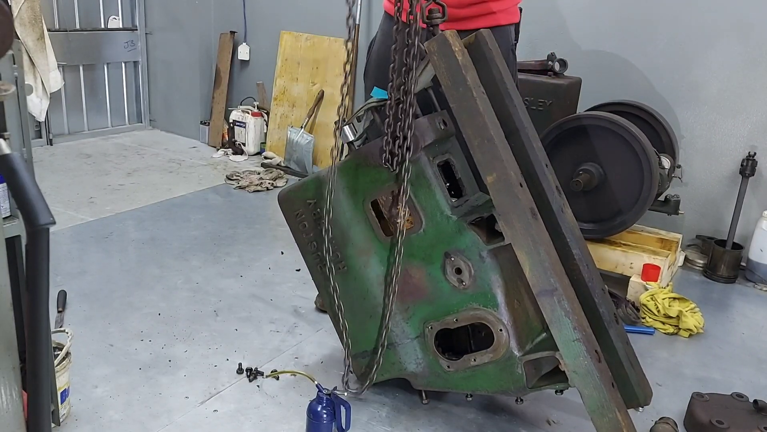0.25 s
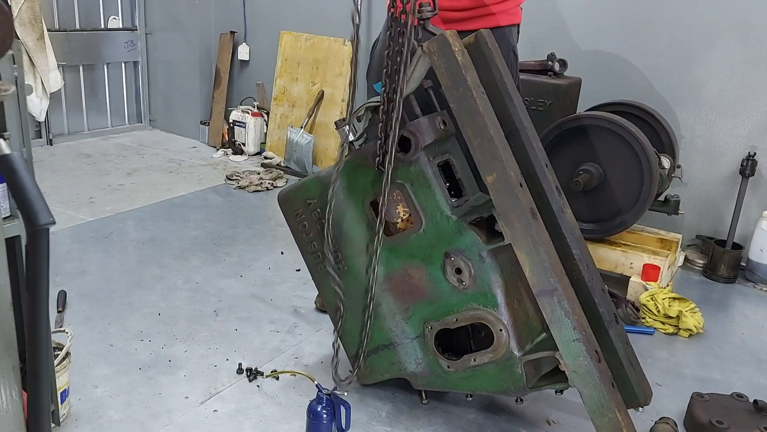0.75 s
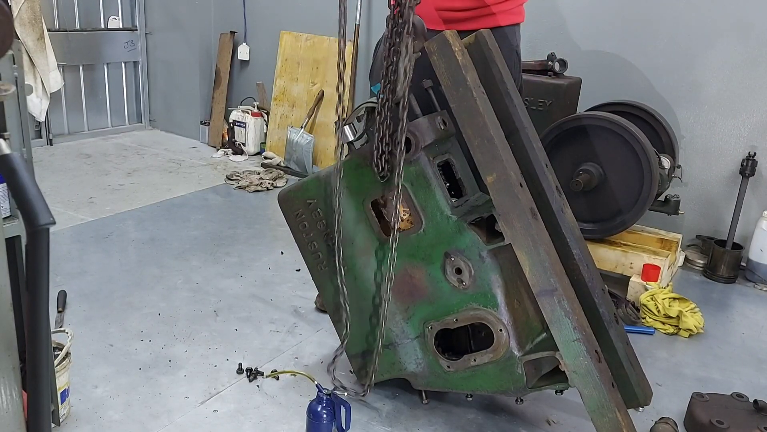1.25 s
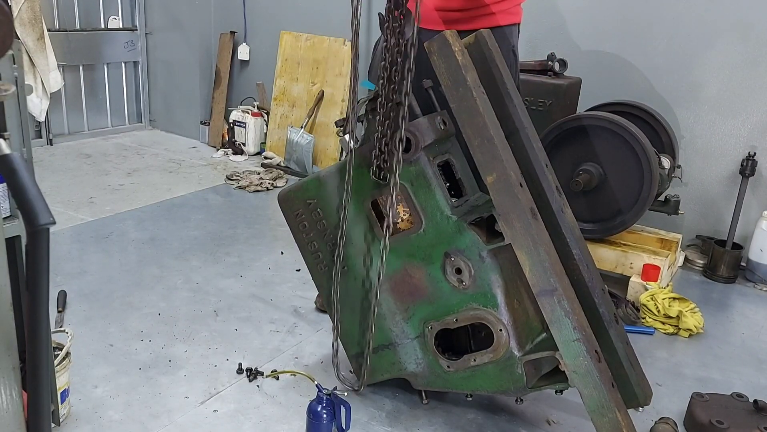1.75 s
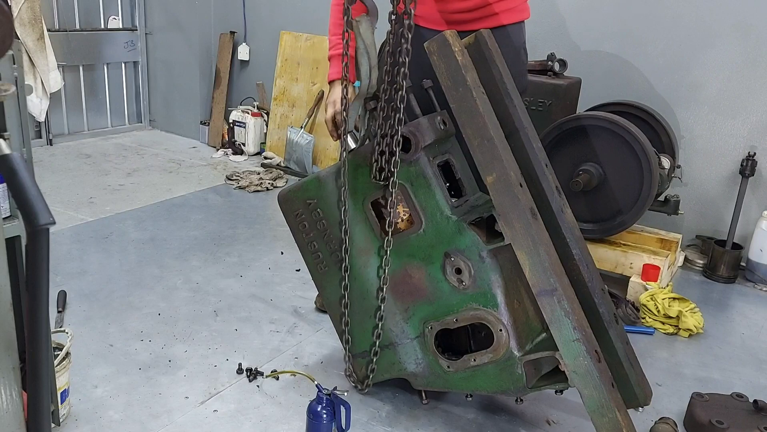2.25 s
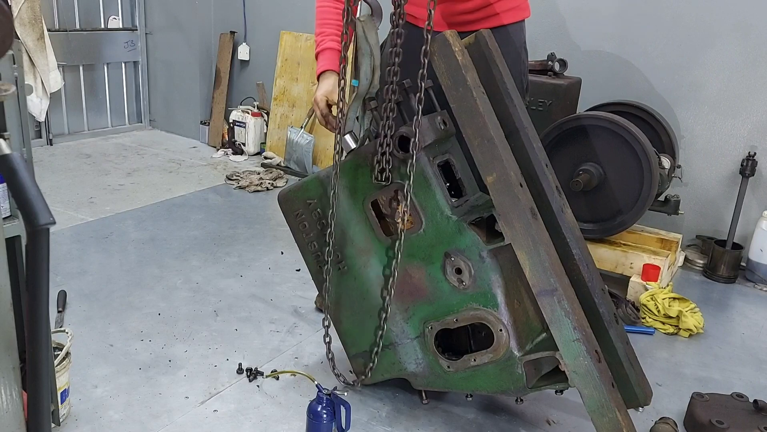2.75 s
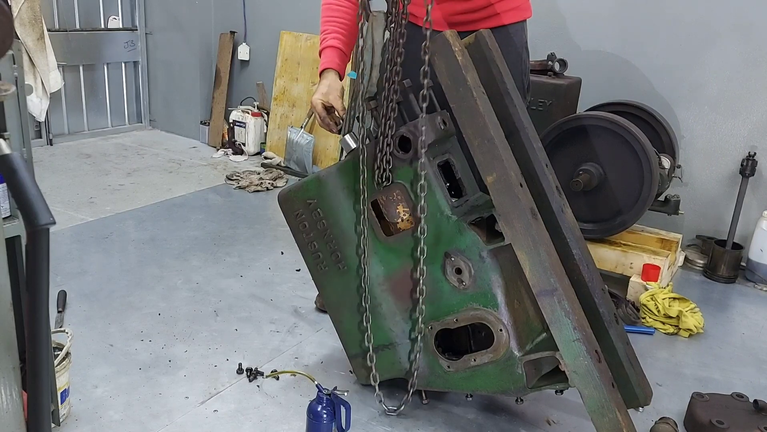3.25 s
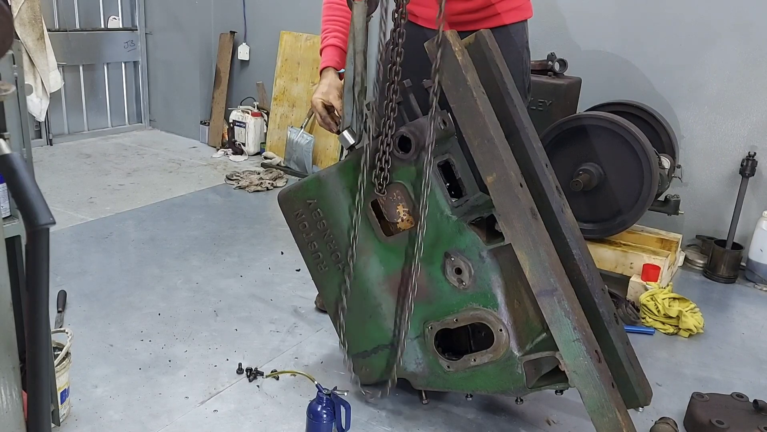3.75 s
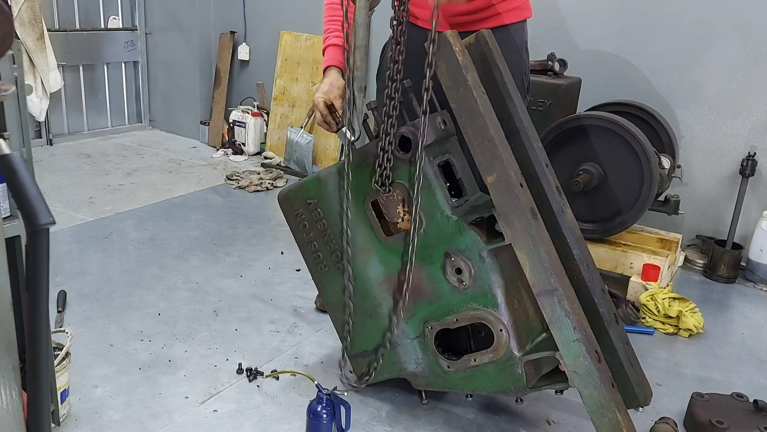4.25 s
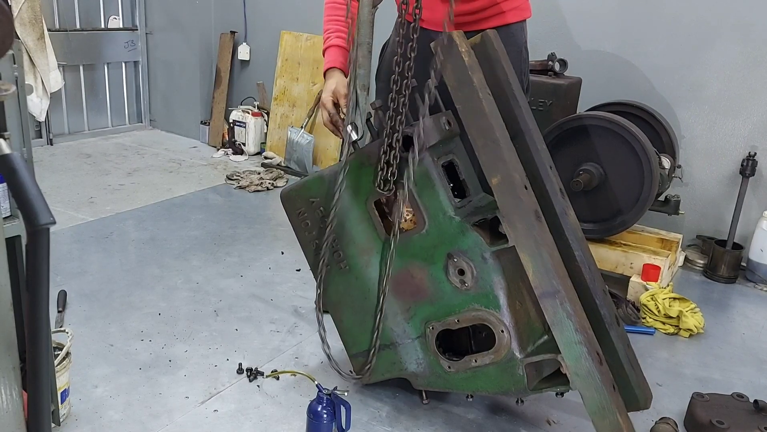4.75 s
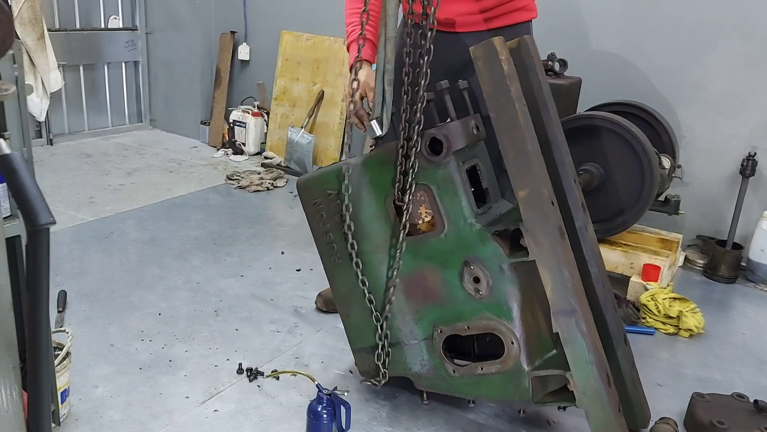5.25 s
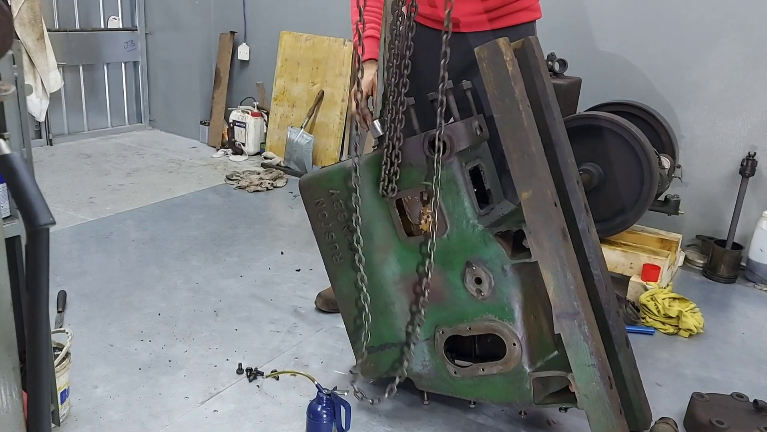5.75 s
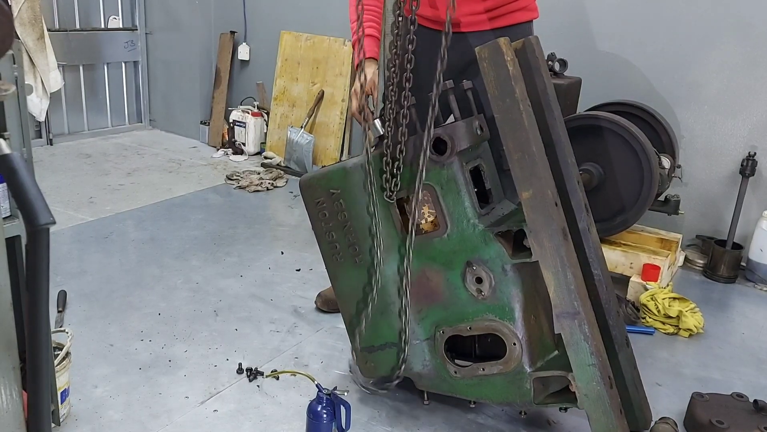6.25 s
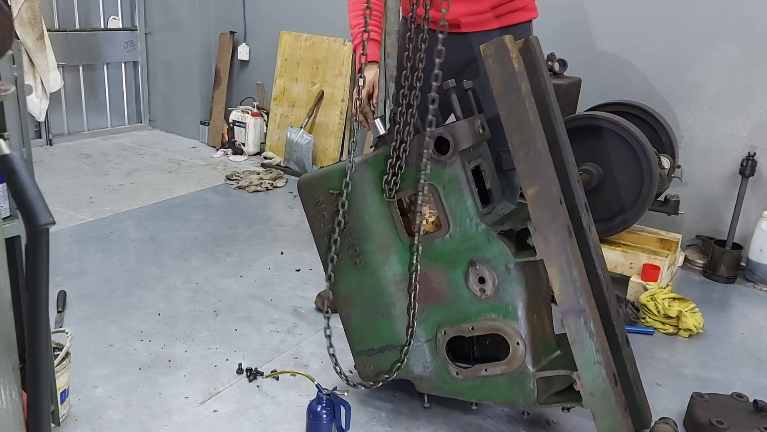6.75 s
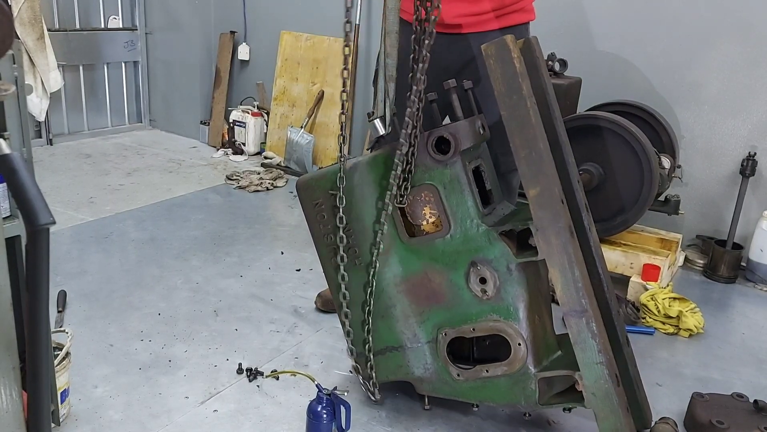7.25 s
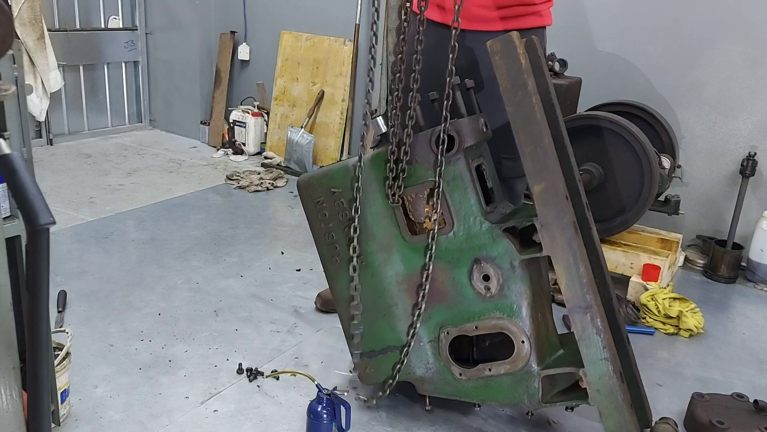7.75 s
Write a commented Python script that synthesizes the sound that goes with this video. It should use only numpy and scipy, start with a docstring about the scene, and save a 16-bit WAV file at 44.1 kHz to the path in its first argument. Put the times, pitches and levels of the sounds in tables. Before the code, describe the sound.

A hand chain hoist works in a hard, echoing workshop, heard from a few metres and louder on the left. From 0 to 2.2 s, three pulls give rapid, sharp steel ratchet clicks, roughly twenty to thirty a second, over a thin chain rattle. The slack loop jingles and knocks on the hollow casting, strongest around 1.5 s. A lull with a small clatter at 2.3 s follows. Pulls resume from 2.9 to 5.15 s in close spells, with bright link slaps near 3.4 and 3.6 s. At 5.25 s a link chinks, then at 5.33 s the load shifts with a crunch, rumble and long low boom, under more clicks until 5.8 s. Another pull runs 6.05-6.45 s; chain scrapes the ringing iron at 6.4 s, with a very faint second shift. Small clinks around 7 s fade, then four slower, firm clicks from 7.45 to 7.8 s and a last light scrape over faint still air.

```python
"""A hand chain hoist lifts a heavy iron casting in a bare, echoing workshop, pull by pull.
Its pawl clicks over the ratchet (short noise snaps), and the hand chain rattles through the wheel
(random ticks and pings). The slack loop slaps and drags on the load, whose iron modes ring along.
The load shifts with a thud and a long low boom, and once more very faintly. Still air lies behind."""
import sys
import numpy as np
from scipy import signal
from scipy.fft import rfft, irfft, next_fast_len
from scipy.io import wavfile
from scipy.ndimage import uniform_filter1d

SR = 44100
rng = np.random.default_rng(int(sys.argv[2]) if len(sys.argv) > 2 else 0)


def generate_wav(signal):
    """Clip the signal to [-1, 1] and save it as 16-bit WAV at the path in sys.argv[1]."""
    frames = np.transpose(np.atleast_2d(signal))
    scaled = np.clip(frames, -1, 1) * 32767
    pcm = np.round(scaled).astype(np.int16)
    wavfile.write(sys.argv[1], SR, pcm)


N = 353241  # length of the scene in samples
TOP_HZ = 15850  # nothing sounds above this pitch

# All levels are relative: the mix adds its own gains. A t60_s is the time to fade by 60 dB.

# Pulls on the hand chain: [first_click_s, last_click_s, clicks, start_lag_teeth, stop_lag_teeth,
# pawl_db, chain_start_db, chain_end_db]
# The lags say how slowly the wheel gets going and comes to rest, in tooth times; their sign is ignored.
PULLS = [(0.0054, 0.5573, 12, 0.9, 8.5, -16, -31, -38), (0.683, 1.3662, 20, 0.3, 1.13, -15.5, -29.5, -34),
         (1.4604, 2.1724, 15, 0, 5.5, -20.5, -35, -36.5), (2.871, 3.288, 11, 1.3, 0.24, -18.5, -31.5, -34),
         (3.3785, 3.927, 18, -1, 2.1, -18.5, -31.5, -40), (3.9857, 4.564, 13, -1, 8.5, -19, -33, -49.5),
         (4.6553, 5.1467, 12, 1, 2.5, -18.5, -40.5, -35.5), (5.343, 5.7605, 12, 1, 1, -16, -32, -38.5),
         (6.0625, 6.4524, 10, 1.9, 2.3, -16.5, -34.5, -38), (7.443, 7.8124, 4, 5, 5.5, -13, -48, -46)]
# Broad tone of the pawl: [pitch_hz, level_db]
PAWL_TONE = [(50, -22), (200, -15.5), (420, -6.5), (750, -12.5), (1300, -0.5), (5000, -2.5), (8300, -2),
             (15500, -6.5)]
# Ringing pitches of the pawl: [pitch_hz, width_hz, level_db]
PAWL_RING = [(1521, 75, 6), (4440, 400, 6), (10100, 365, 14.5), (13720, 390, 14)]


def ratchet():
    """The pawl snaps onto each tooth and chatters for a few milliseconds."""
    db_per_doubling = 0.56  # a faster wheel flicks the pawl harder
    scatter_db, first_click_db = 0.76, -1.5  # teeth differ; each pull starts gently, taking up the slack
    drops = np.zeros(N)
    for *stroke, pawl_db, _, _ in PULLS:
        clicks = teeth(*stroke)
        scatter = rng.normal(0, scatter_db, len(clicks))
        levels = pawl_db + 4 + db_per_doubling * speed(clicks) + scatter
        levels[0] += first_click_db
        for click_s, level_db in zip(clicks, levels):
            add(drops, click_s, amp(level_db) * snap(t60=0.017, attack=0.0015))
    return colour(drops, PAWL_TONE, PAWL_RING)


def teeth(first, last, clicks, start_lag, stop_lag):
    """Click times of one pull: the wheel gathers speed, runs, and slows as the arm runs out of reach."""
    k = np.arange(1, round(clicks))
    gaps = 1 + abs(start_lag) / k + abs(stop_lag) / k[::-1]
    return first + (last - first) * np.append(0, np.cumsum(gaps)) / gaps.sum()


def speed(clicks):
    """The wheel's speed at each click, in doublings above a brisk pull."""
    brisk_rate = 33  # teeth per second
    return np.log2(1 / np.gradient(clicks) / brisk_rate)


# Tone of the chain in its wheel: [pitch_hz, level_db]
WHEEL_TONE = [(30, -38.5), (100, -12), (220, -15.5), (400, -12.5), (850, -14.5), (1500, -0.5), (2400, -2.5),
              (4500, -3.5), (6600, 0.5), (8200, -15.5), (10500, -3.5), (15800, -13)]


def hand_chain():
    """Links tumble through the wheel and its guide, louder the faster the pull."""
    db_per_doubling = 1.5  # a faster chain is louder
    take_up_s = 0.064  # the rattle builds up after the first click
    t, gain = np.arange(N) / SR, np.zeros(N)
    for *stroke, _, start_db, end_db in PULLS:
        clicks = teeth(*stroke)
        level_db = np.linspace(start_db, end_db, len(clicks)) + db_per_doubling * speed(clicks)
        build_up = np.clip((t - clicks[0]) / take_up_s, 0, 1)
        gain += np.interp(t, clicks, amp(level_db), right=0) * build_up
    rattle = links(rate=700, spread_db=5.5, ring_t60=0.037)
    return amp(-2.5) * gain * unit(colour(rattle, WHEEL_TONE))


# The slack loop swings against the casting: [start_s, rise_s, hold_s, jingle_db, knock_db]
SWINGS = [(0, 0.0026, 0.016, -27.5, -52), (0.1, 0.049, 0.0092, -29.5, -34.5),
          (0.358, 0.02, 0.014, -28.5, -52), (0.377, 0.01, 0.036, -38, -41),
          (0.574, 0.037, 0.087, -31.5, -40.5), (0.797, 0.15, 0.06, -24, -47),
          (1.442, 0.054, 0.076, -19, -27.5), (1.604, 0.018, 0.15, -24, -32),
          (1.868, 0.027, 0.044, -41.5, -44), (2.05, 0.032, 0.081, -41, -44.5),
          (2.868, 0.036, 0.16, -31, -44), (3.33, 0.1, 0.1, -20, -32), (3.579, 0.038, 0.035, -21, -30),
          (3.996, 0.075, 0.15, -25, -36), (4.746, 0.065, 0.12, -34, -50.5), (5.133, 0.04, 0.08, -42, -50),
          (5.415, 0.01, 0.016, -28, -35.5), (5.508, 0.036, 0.046, -26, -42),
          (6.74, 0.026, 0.045, -71.5, -63), (7.03, 0.004, 0.0093, -53, -46), (7.3, 0.03, 0.06, -65, -65)]
# Single links strike the load: [start_s, level_db]
LINK_STRIKES = [(0.1654, -4), (0.345, -6), (1.5538, -10), (1.6236, -5), (1.6902, -4), (2.084, -25.5),
                (2.526, -43.5), (2.7703, -52), (2.7902, -36), (2.8432, -25.5), (3.3623, -9), (3.6297, -5.5),
                (5.3142, -20), (5.4268, -11.5), (6.98, -38.5), (7.0323, -25.5), (7.3896, -38.5)]
# Bright tone of the links: [pitch_hz, level_db]
JINGLE_TONE = [(200, -46.5), (1100, -10), (2000, -7.5), (3300, -7), (4100, -1.5), (7000, 0.5),
               (12000, -4.5), (15500, -16.5)]
# Dull tone of the knocks: [pitch_hz, level_db]
KNOCK_TONE = [(50, -26), (230, -13), (340, -5), (540, 0.5), (750, 1.5), (1100, -4.5), (2500, -33)]
# Resonances of the casting's hollow wall: [pitch_hz, width_hz, level_db]
HOLLOW_WALL = [(325, 24, 8.5), (480, 57, 6), (588, 57, 2.5)]


def slack_loop():
    """Swinging links jingle on the casting, whose hollow wall knocks under them."""
    jingle_gain, knock_gain, strikes = np.zeros((3, N))
    for s, rise, hold, jingle_db, knock_db in SWINGS:
        contact = swell(s, rise, hold, release_t60=0.33)  # the links settle
        jingle_gain = np.maximum(jingle_gain, amp(jingle_db) * contact)
        knock_gain = np.maximum(knock_gain, amp(knock_db) * contact)
    bright_links = links(rate=450, spread_db=7, ring_t60=0.026)
    dull_links = links(rate=160, spread_db=5.5, ring_t60=0.014)
    jingle = jingle_gain * unit(colour(bright_links, JINGLE_TONE))
    knock = knock_gain * unit(colour(dull_links, KNOCK_TONE, HOLLOW_WALL))
    for s, level_db in LINK_STRIKES:
        add(strikes, s, amp(level_db - 6) * snap(t60=0.024, attack=0.00019))
    return amp(-3.5) * jingle + amp(-7) * knock + colour(strikes, JINGLE_TONE)


# The chain drags over a ringing edge of the load: [start_s, rise_s, hold_s, level_db]
DRAGS = [(6.418, 0.005, 0.025, -22.5), (6.496, 0.02, 0.1, -38.5), (6.726, 0.027, 0.072, -49.5),
         (7.043, 0.03, 0.064, -39), (7.187, 0.031, 0.036, -57), (7.771, 0.02, 0.098, -30.5)]
# Tone of grating links: [pitch_hz, level_db]
GRATE_TONE = [(100, -35), (400, -5), (850, -5), (1400, 1.5), (1900, -2), (4000, -2.5), (5500, -6.5),
              (14000, -19)]


def drag():
    """Links grate over an edge of the load and take on the colour of its ringing pitches."""
    contact = sum(amp(db) * swell(s, rise, hold, release_t60=0.15) for s, rise, hold, db in DRAGS)
    edge_width_hz, edge_db = 33, 13.5
    edge = [(hz, edge_width_hz, db + edge_db) for hz, db, _ in IRON_MODES]
    grating = links(rate=600, spread_db=11, ring_t60=0.03)
    return amp(-5) * contact * unit(colour(grating, GRATE_TONE, edge))


# The load's ringing pitches, before the chain damps them: [pitch_hz, level_db, t60_s]
IRON_MODES = [(562, -7, 0.85), (762, -16, 4.8), (975, -13.5, 1.2), (1283, -8, 1.1), (1370, -6, 2.4),
              (1590, -16.5, 1.1), (1779, 2.5, 0.39), (2164, -6, 0.42), (2606, -4.5, 0.48),
              (2970, -19.5, 0.4), (3210, -11, 0.61), (3260, -8.5, 0.5), (3800, -9.5, 0.4), (3980, -9, 0.45),
              (4370, -19, 0.4), (4910, -21, 0.35)]


def iron_ring(contacts):
    """Every mode of the load fills with the energy of the contacts and leaks it at its own speed."""
    damping_t60 = 2.2  # s, the chain lying on the iron shortens its ring
    t, out = np.arange(N) / SR, np.zeros((2, N))
    for hz, db, t60 in IRON_MODES:
        # share of the energy left after one sample
        keep = np.exp(-2 * np.log(1000) * (1 / t60 + 1 / damping_t60) / SR)
        wandering = contacts * amp(0.92 * wobble(rate=5.4))  # the contact point wanders
        energy = signal.lfilter([1 / SR], [1, -keep], wandering ** 2)
        start_phase = rng.uniform(0, 2 * np.pi, (2, 1))  # left and right differ
        phase = 2 * np.pi * hz * t + .5 * wobble(rate=37) + start_phase
        out += amp(db + 1.4 * wobble(rate=23)) * np.sqrt(energy) * np.sin(phase)
    return out


# The load shifts on the floor: [start_s, length_s, crunch_db, rumble_db, boom_db]
SHIFTS = [(5.327, 0.27, -30.5, -34, -28.5), (6.519, 0.4, -50, -44.5, -48)]
# Tone of the crunch: [pitch_hz, level_db]
CRUNCH_TONE = [(50, -23), (130, -4.5), (220, -16), (330, -0.5), (560, -2.5), (800, -12), (2500, -30.5)]
# Tone of the rumble: [pitch_hz, level_db]
RUMBLE_TONE = [(20, -26), (42, -4), (85, -0.5), (250, -24.5), (600, -61)]
# The hanging load's low modes: [pitch_hz, level_db, t60_s]
BOOM_MODES = [(69, -0.5, 1.56), (68.2, -6, 3.6), (110.6, -13, 1.55)]


def load_shift():
    """The casting slips on the floor with a crunch and a rumble, then booms on its taut chain."""
    crunch, rumble, boom = np.zeros((3, N))
    t = np.arange(3 * SR) / SR
    modes = sum(amp(db - 60 * t / t60) * np.sin(2 * np.pi * hz * t) for hz, db, t60 in BOOM_MODES)
    modes = modes * (1 - np.exp(-t / 0.05))  # soft onset
    for s, length, crunch_db, rumble_db, boom_db in SHIFTS:
        add(crunch, s, amp(crunch_db) * burst(t60=length, attack=0.0024))
        add(rumble, s, amp(rumble_db) * burst(t60=3.6 * length, attack=0.026))
        add(boom, s + 0.0132, amp(boom_db) * modes)
    return colour(crunch, CRUNCH_TONE), colour(rumble, RUMBLE_TONE) + boom


# A taut link's ring: [pitch_hz, width_hz, level_db]
TAUT_LINK = [(3220, 110, 27), (3830, 90, 28.5)]


def chink():
    """A link of the load chain slips into its seat and rings briefly, just before the load shifts."""
    slip = np.zeros(N)
    add(slip, 5.249, amp(-29.5) * burst(t60=0.061, attack=0.0022))
    return colour(slip, GRATE_TONE, TAUT_LINK)


# A few slack links tumble together: [start_s, level_db, length_s]
TUMBLES = [(2.299, -32, .2), (2.58, -57, .1), (7.021, -44, .1), (7.416, -37, .1)]


def tumbles():
    """Slack links fall against each other in a short, dull clatter."""
    clatter = np.zeros(N)
    for s, level_db, length in TUMBLES:
        add(clatter, s, amp(level_db) * burst(t60=length, attack=.002))
    return colour(clatter, GRATE_TONE)


# How long the echoes last: [pitch_hz, t60_s]
ROOM_DECAY = [(100, 1), (600, 0.81), (1400, 0.8), (6000, 0.59), (14000, 0.33)]
# How alike the echoes are left and right: [pitch_hz, likeness from 0 to 1]
LEFT_RIGHT_LIKENESS = [(60, 0.65), (250, 0.55), (500, 0.29), (1200, 0.023)]


def workshop(x, early_db, early_t60):
    """Hard walls: strong first echoes, then a tail that dies sooner in the treble."""
    hz, t, noise = signal.stft(rng.standard_normal((2, SR)), SR, nperseg=256)
    likeness = np.clip(along(LEFT_RIGHT_LIKENESS, hz), 0, 1)
    turn = np.arccos(likeness)[:, None] / 2
    decay = amp(-60 * t / along(ROOM_DECAY, hz)[:, None]) + amp(early_db - 60 * t / early_t60)
    shares = np.array([np.cos(turn), np.sin(turn)])
    mid, side = signal.istft(noise * decay * shares, SR, nperseg=256)[1]
    tail = np.pad([mid + side, mid - side], ((0, 0), (SR // 250, 0)))  # echoes start 4 ms late
    return signal.fftconvolve(x[None], tail / np.linalg.norm(tail[0]), axes=1)[:, :N]


def heard(x, direct_db, echo_db, pan_db):
    """A source a few metres away: more echo than direct sound, which reaches the right side first."""
    direct = np.array([x, np.roll(x, shift=-3)])  # right leads by 3 samples
    # the sound leaves from ever different places along the chain, each with its own echoes
    places = np.array([wobble(rate=16) for _ in range(4)])
    places = places / np.linalg.norm(places, axis=0)
    echo = sum(workshop(x * share, early_db=-8, early_t60=0.024) for share in places)
    return (amp(direct_db) * direct + amp(echo_db) * echo) * amp([[pan_db], [-pan_db]])


# Tone of the still air: [pitch_hz, level_db]
AIR_TONE = [(25, -21), (80, -4.5), (220, -18), (650, -20.5), (2000, -11), (15000, -52.5)]


def still_air():
    """The air of the shop: a faint steady noise, separate on each side."""
    noises = rng.standard_normal((2, N))
    return amp(-68) * np.array([unit(colour(noise, AIR_TONE)) for noise in noises])


def links(rate, spread_db, ring_t60, size=384):
    """Random contacts at rms 1: each is a sharp tick and a brief ping at the link's own pitch."""
    t = np.arange(size) / SR
    gap, force, pitch, side = rng.random((int(rate * N / SR), 4)).T
    waits = np.cumsum(-np.log(1 - gap))
    at = (waits / waits[-1] * (N - 1)).astype(int)
    strength = amp(2 * spread_db * force ** 2) * np.sign(side - .5)
    waves = np.sin(2 * np.pi * TOP_HZ * pitch[:, None] * t)
    pings = strength[:, None] * waves * amp(-60 * t / ring_t60)
    ring = np.bincount((at[:, None] + np.arange(size)).ravel(), pings.ravel())[:N]
    ticks = np.bincount(at, strength, N)
    # a steady pull feeds steady power
    supply = np.abs(uniform_filter1d(ticks ** 2, size=SR // 16)) + np.mean(ticks ** 2) / 10
    return unit((unit(ticks) + .5 * unit(ring)) / np.sqrt(supply))


def snap(t60, attack):
    """A hard steel contact: a chatter of tiny impacts, about equally strong at every frequency."""
    chatter = burst(t60, attack)
    phases = np.angle(rfft(chatter, 4 * len(chatter)))
    even = irfft(np.exp(1j * phases))[:len(chatter)]
    return even * np.linalg.norm(chatter) / np.linalg.norm(even)


def burst(t60, attack):
    """A puff of noise that swells and dies, one second long at most."""
    t = np.arange(min(int(t60 * SR) + 2, SR)) / SR
    return rng.standard_normal(len(t)) * amp(-60 * t / t60) * (1 - np.exp(-t / attack))


def swell(s, rise, hold, release_t60):
    """Gain per sample of a spell of rattling: it rises from time s, holds and dies away."""
    t = np.arange(N) / SR - s
    return np.clip(t / rise, 0, 1) * amp(-60 * np.clip((t - rise - hold) / release_t60, 0, 2))


def colour(x, points, peaks=(), size=8192):
    """A causal filter of unit power: a broad spectrum with resonances on top."""
    hz = np.fft.rfftfreq(size, 1 / SR)
    resonance = sum(amp(db) ** 2 / (1 + (2 * (hz - f) / width) ** 2) for f, width, db in peaks)
    gain = amp(along(points, hz)) * np.sqrt(1 + resonance)
    # folding the cepstrum makes the filter respond as early as it can
    cepstrum = irfft(np.log(gain + 1e-6))
    cepstrum[1:size // 2] *= 2
    cepstrum[size // 2 + 1:] = 0
    kernel = irfft(np.exp(rfft(cepstrum)))
    return signal.oaconvolve(x, kernel / np.linalg.norm(kernel))[:N]


def along(points, hz):
    """(pitch_hz, value) points read on a log axis."""
    f, v = np.transpose(points)
    return np.interp(np.log(hz + 1), np.log(f + 1), v)


def wobble(rate):
    """A smooth random curve, rate knots a second, joined by straight lines."""
    knots = rng.standard_normal(int(N * rate / SR) + 4)
    return np.interp(np.arange(N) * rate / SR, np.arange(len(knots)), knots)


def add(track, s, sound):
    """Mix a sound into a track at time s."""
    start = int(np.clip(round(s * SR), 0, N - 1))
    track[start:start + len(sound)] += sound[:N - start]


def amp(db):
    """Decibels to gain."""
    return 10 ** (np.asarray(db) / 20)


def unit(x):
    """x at rms 1."""
    return x / np.sqrt(np.mean(x ** 2) + 1e-20)


def scene():
    """The hoist overhead, the load and its slack chain below, and the still air of the shop."""
    grating, loop = drag(), slack_loop()
    crunch, low = load_shift()
    pawl = heard(ratchet(), direct_db=-2, echo_db=3, pan_db=0.36)
    rattle = hand_chain() + tumbles() + chink() + grating + crunch
    hoist = heard(rattle, direct_db=-3, echo_db=3.5, pan_db=0.3)
    load = heard(loop, direct_db=0, echo_db=3, pan_db=-0.5)
    ring = iron_ring(amp(16.5) * grating + amp(-8.5) * loop)
    return pawl + hoist + load + ring + low + still_air()


def record(dry):
    """The left channel is much the stronger; sharp peaks round off, then all above TOP_HZ is cut."""
    level = dry * amp([[5], [-5.3]])
    rounded = level / (1 + np.abs(level / .8) ** 6) ** (1 / 6)
    size = next_fast_len(N + SR // 4)
    passed = np.fft.rfftfreq(size, 1 / SR) < TOP_HZ
    return irfft(rfft(rounded, size) * passed, size)[:, :N]


dry = scene()
out = record(dry)
generate_wav(out)
```